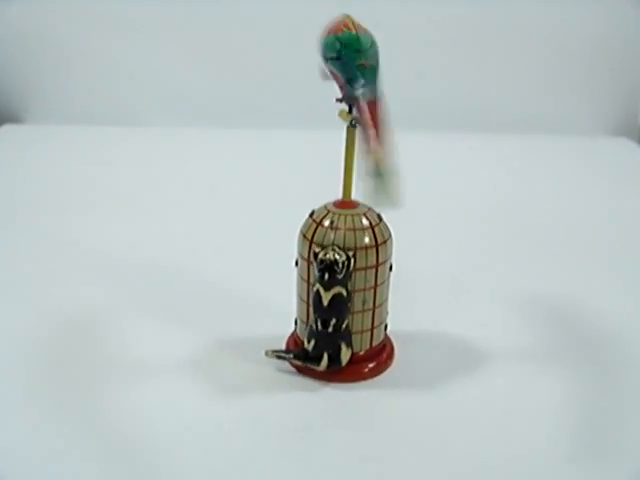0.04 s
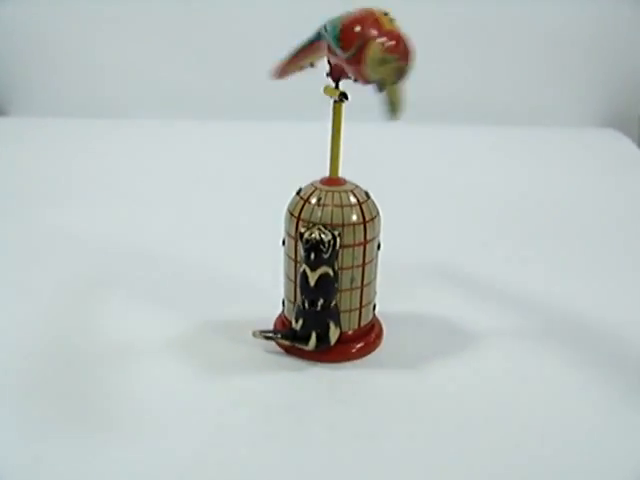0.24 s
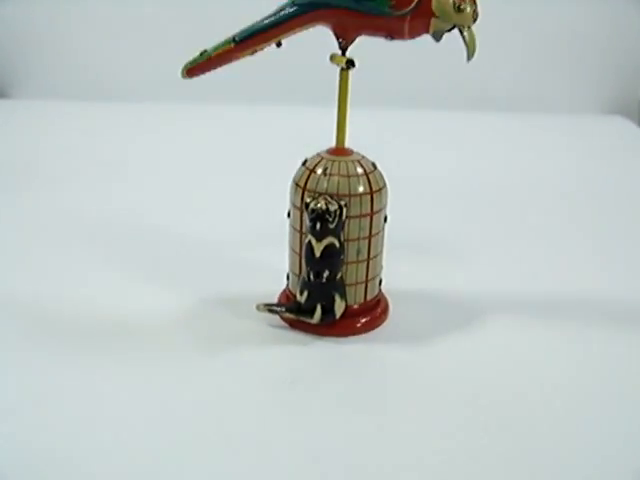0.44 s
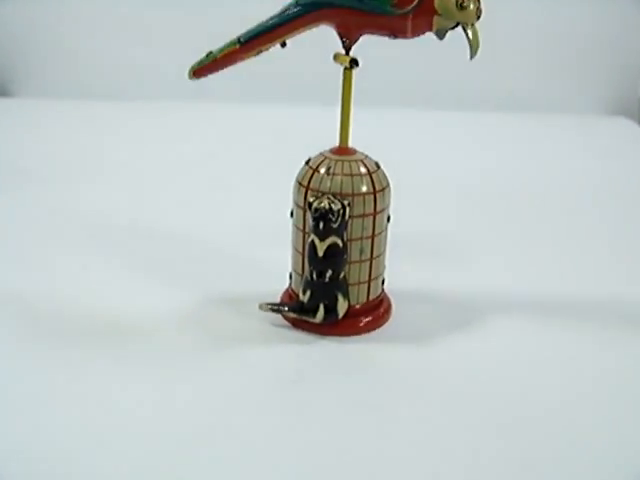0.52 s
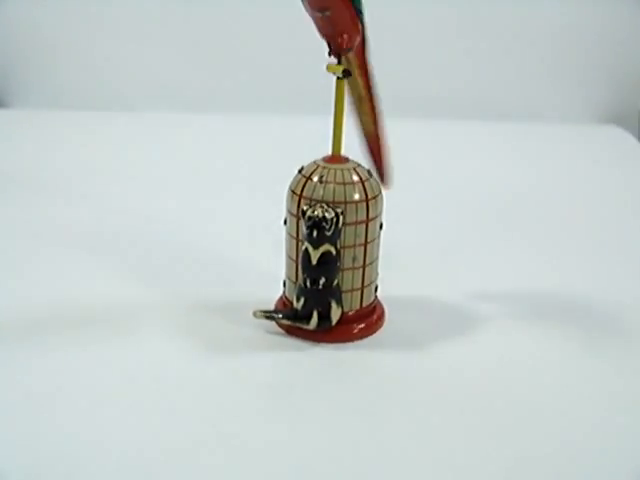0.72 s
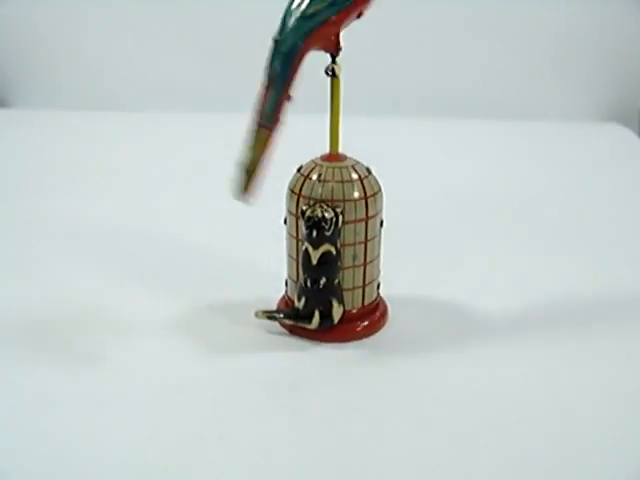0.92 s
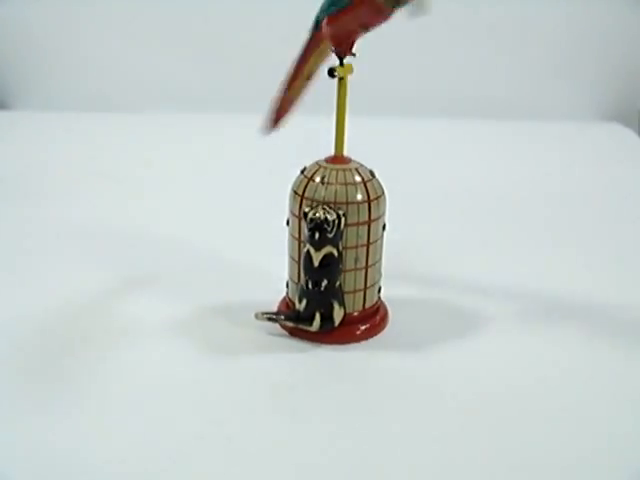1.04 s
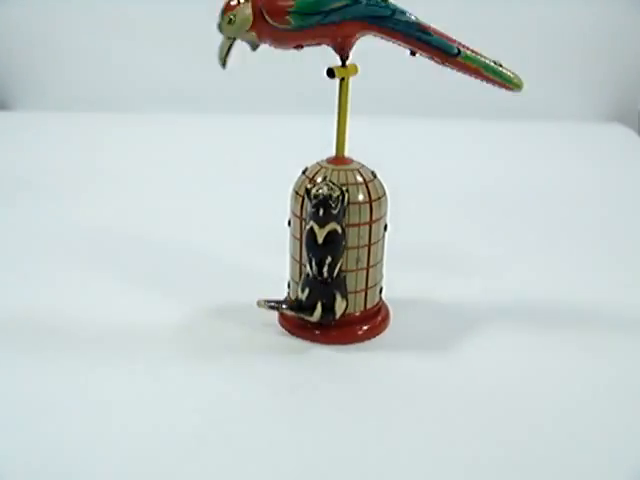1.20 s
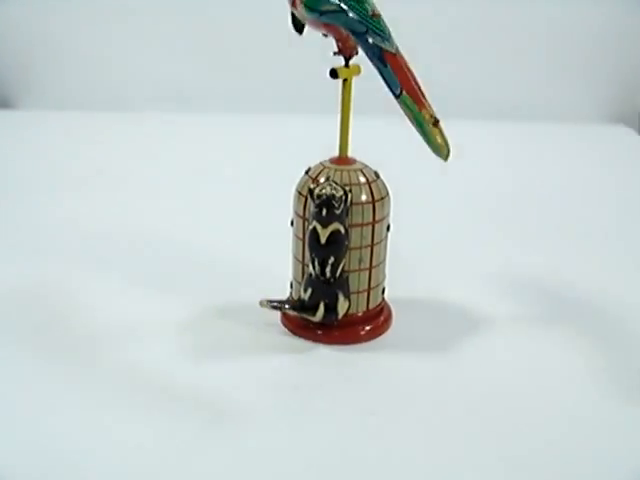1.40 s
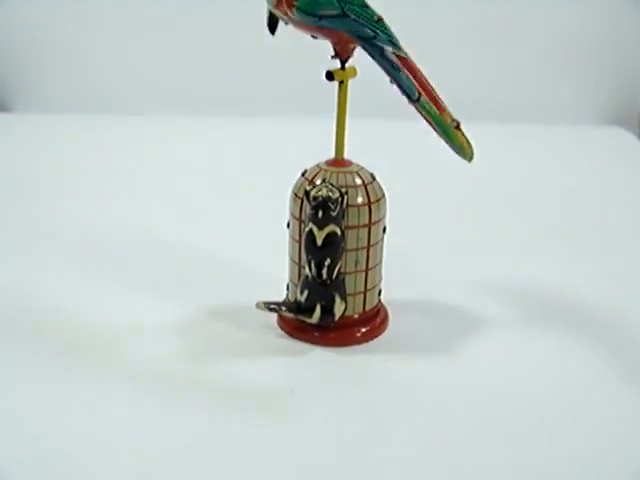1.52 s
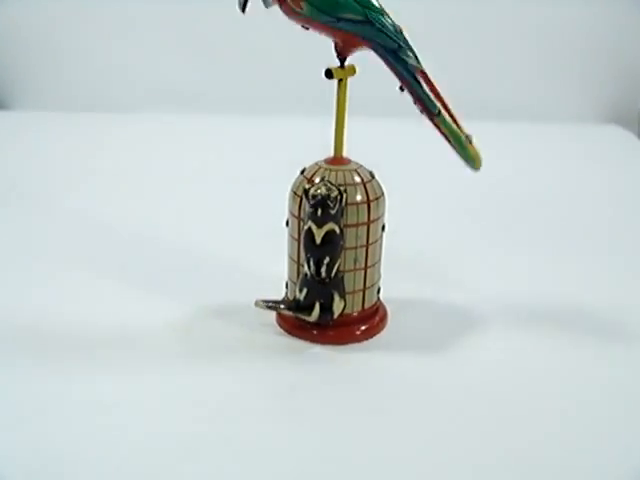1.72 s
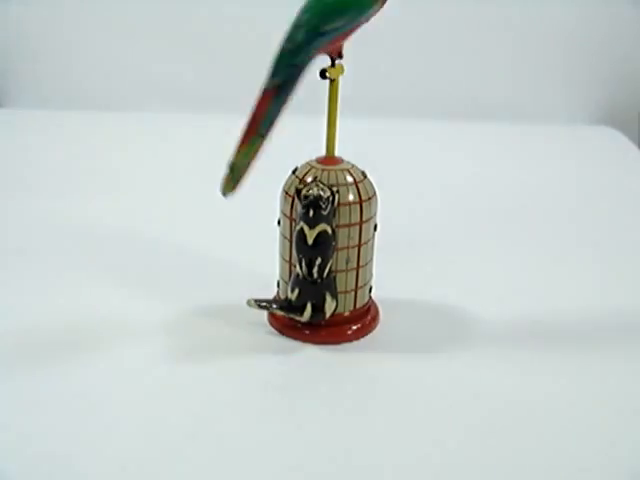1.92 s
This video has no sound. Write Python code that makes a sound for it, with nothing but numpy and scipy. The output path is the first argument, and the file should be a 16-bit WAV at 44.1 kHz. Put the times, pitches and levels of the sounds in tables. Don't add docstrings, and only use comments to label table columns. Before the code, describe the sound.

A tin wind-up toy clacks on a table. After a faint whir and ticks, five loud bouncing clacks at 0.22-0.44 s rattle the thin shell and ring briefly. Near quiet until 0.8 s, then ticks, scrapes and weaker clacks from 0.87 s, growing to a hard cluster at 1.22-1.32 s and a sharp base slap at 1.42 s. Small knocks and ticks follow until 1.92 s over soft room hiss.

```python
import sys
import numpy as np
from scipy import signal
from scipy.fft import rfft, irfft, next_fast_len
from scipy.io import wavfile
from scipy.ndimage import uniform_filter1d

SR = 44100
rng = np.random.default_rng(int(sys.argv[2]) if len(sys.argv) > 2 else 0)


def volts_from_db(level):
    exponent = np.asarray(level, float) / 20
    return 10 ** exponent


def master_out(mix):
    frames = np.transpose(np.atleast_2d(mix))
    ceiling = np.clip(frames, -1, 1)
    pcm = np.round(ceiling * 32767).astype(np.int16)
    wavfile.write(sys.argv[1], SR, pcm)


N = 85995
SIZE = 8192


def unit(x):
    return x / np.sqrt(np.mean(x ** 2) + 1e-20)


def along(points, hz):
    f, value = np.transpose(points)
    return np.interp(np.log(hz + 1), np.log(f + 1), value)


def curve(rows):
    s, db = np.transpose(rows)
    return volts_from_db(np.interp(np.arange(N) / SR, s, db))


def filtered(x, response):
    m = 2 * next_fast_len((len(x) + SIZE) // 2)
    return irfft(rfft(x, m) * response(np.fft.rfftfreq(m, 1 / SR)), m)[:len(x)]


def add(out, s, x):
    part = out[round(s * SR):][:len(x)]
    part += x[:len(part)]


# t/s, level/dB, favoured mode f/Hz, brightness level/dB, low dome note level/dB
CLACKS = [(0.2191, -13.6, 2250, -0.8, 7.5), (0.2519, -16.2, 2800.0, -3.6, -0.9),
          (0.299, -18.0, 3500.0, 0.5, 10.2), (0.3545, -18.1, 3520.0, 3.1, 5.9),
          (0.4375, -18.3, 1800, 0.9, 0.5), (0.8905, -26.7, 2230.0, 0.3, -2.0),
          (0.9334, -27.5, 3700, -1.8, -4.9), (1.1324, -24.6, 1950.0, -4.1, -13.2),
          (1.1683, -28.3, 3480, 1.6, -3.1), (1.2217, -17.9, 3600.0, 4.6, 2.3),
          (1.2457, -24.3, 3600.0, 1.2, -1.1), (1.2558, -26.9, 6800.0, 4.6, -3.0),
          (1.2627, -20.8, 2280.0, 6.7, 1.7), (1.3241, -18.3, 2200, 0.9, 0.7),
          (1.4193, -20.6, 4300, 1.3, 1.3)]


def clacks():
    return blows(CLACKS, rise_s=0.0012, t60=0.021, spike_db=14.5)


def blows(rows, rise_s, t60, spike_db):
    lead_s, peak_s = .005, .001
    favour_db, favour_width_hz = 1, 500
    shake_db, shake_s = -18.5, 0.16
    out, t = np.zeros(N), np.arange(SIZE) / SR - lead_s
    swell = np.exp(np.minimum(t - peak_s, 0) / rise_s)
    decay = volts_from_db(-60 * (t - peak_s) / t60) + volts_from_db(shake_db - 60 * t / shake_s)
    for s, db, hz, *colour_db in rows:
        force = chatter(SIZE) * np.where(t < peak_s, swell, decay)
        force[round(.006 * SR)] += volts_from_db(spike_db + 10 + 0.45 * db)

        def shell(f):
            return tin(f, *colour_db) * (1 + volts_from_db(favour_db) * mode(f, hz, favour_width_hz))

        x = filtered(even(force), shell)
        strength = np.std(x[round(lead_s * SR):][:round(.006 * SR)])
        add(out, s - lead_s, volts_from_db(db) * x / strength)
    return out


def chatter(count):
    jumps = 2.98 * uniform_filter1d(rng.standard_normal(count), size=9)
    return unit(rng.standard_normal(count) * volts_from_db(4.97 * jumps))


def even(force):
    z = rfft(force)
    power = uniform_filter1d(np.abs(z) ** 2, size=round(500 * len(force) / SR))
    return irfft(z / np.sqrt(np.abs(power) + 1e-9))


def mode(f, hz, width_hz):
    return 1j * f * width_hz / (hz * hz - f * f + 1j * f * width_hz)


# f/Hz, width f/Hz, level/dB
TIN_MODES = [(1085, 91, -5), (1490, 120, -5), (1790, 110, 1), (2030, 150, .5), (2300, 220, -5),
             (2710, 260, -2), (3068, 400, -11), (3520, 220, -2.5), (3900, 260, -8.5), (4727, 490, -8),
             (5150, 350, -10.5), (6650, 550, -5.5), (7586, 600, -6.5), (9283, 1220, -10.5)]


def tin(f, bright_db=0, dome_db=0):
    scatter_db, body_db = 1.5, -22
    gains = volts_from_db(scatter_db * rng.standard_normal(len(TIN_MODES)))
    power = 0
    for (hz, width_hz, db), gain in zip(TIN_MODES, gains):
        level = db + bright_db * (hz > 4400) + dome_db * (hz < 1200)
        power = power + np.abs(gain * volts_from_db(level) * mode(f, hz, width_hz)) ** 2
    radiated = f ** 4 / (755 ** 4 + f ** 4)
    return causal(volts_from_db(body_db) + np.sqrt(power) * radiated)


def causal(gain):
    c = irfft(np.log(gain + 1e-6))
    c[1:len(c) // 2] *= 2
    c[len(c) // 2 + 1:] = 0
    return np.exp(rfft(c))


# f/Hz, level/dB, t60 t/s
CAGE_RINGS = [(1785, -21.5, 0.31), (2000, -26, .14), (2700, -26, .14), (3540, -25, .25), (3914, -27, 0.3),
              (5240, -24, 0.19), (7300, -22, 0.053)]


def rings():
    out, t = np.zeros(N), np.arange(SR // 2) / SR
    for s, db, *_, dome_db in CLACKS:
        dome_hz = 1085 * (1 + .012 * rng.standard_normal())
        add(out, s, volts_from_db(db + dome_db - 23 - 60 * t / .08) * np.sin(2 * np.pi * dome_hz * t))
        for hz, level, t60 in CAGE_RINGS:
            fade = volts_from_db(db + level + 3 * rng.standard_normal() - 60 * t / t60)
            ring_hz = hz * (1 + .004 * rng.standard_normal())
            waver = .000014 * hz * np.cumsum(rng.standard_normal(len(t)))
            add(out, s, fade * np.sin(2 * np.pi * ring_hz * t + waver))
    pole = volts_from_db(-50 - 60 * t / 1.5) * np.sin(2 * np.pi * 738 * t)
    add(out, .44, pole * np.sin(2 * np.pi * t) ** .5)
    return out


# t/s, level/dB, favoured mode f/Hz, brightness level/dB
TICKS = [(0.0881, -39.7, 2300.0, -7.9), (0.1849, -45.3, 2200.0, -10.0), (0.1946, -49.3, 2600.0, 11.0),
         (0.2405, -26.1, 1790.0, -8.7), (0.2626, -29.5, 3300.0, -3.5), (0.2774, -33.9, 3500.0, 3.0),
         (0.3317, -38.5, 3520.0, -2.5), (0.3794, -31.7, 3400.0, -4.3), (0.4285, -32.1, 2300.0, -14.9),
         (0.4605, -37.9, 3850.0, -5.1), (0.4906, -38.0, 3500.0, -8.9), (0.7946, -39.7, 2900.0, 6.6),
         (0.8283, -40.6, 1050.0, -7.0), (0.8467, -42.0, 2010.0, -5.8), (0.8695, -42.2, 3500.0, -0.6),
         (0.8747, -29.9, 2300.0, 0.1), (0.8778, -34.2, 2600.0, -1.6), (0.922, -36.0, 2000.0, -10.7),
         (0.9283, -33.2, 2000.0, -5.9), (0.9807, -35.1, 2910.0, 1.9), (1.0058, -39.1, 2230.0, -0.2),
         (1.0228, -45.3, 3740.0, -7.3), (1.0375, -33.1, 3590.0, 3.6), (1.0495, -34.1, 2270.0, 1.4),
         (1.106, -47.2, 1720.0, -24.0), (1.1216, -34.7, 3700.0, -0.6), (1.1763, -37.7, 2300.0, -3.0),
         (1.211, -44.2, 2300.0, -8.9), (1.3932, -46.1, 3200.0, -15.0), (1.5231, -45.3, 3330.0, -3.1),
         (1.865, -41.3, 1150.0, -17.1), (1.8749, -52.3, 5000.0, 3.8), (1.918, -41.1, 2300.0, -10.6)]


def ticks():
    return blows(TICKS, rise_s=0.0007, t60=0.028, spike_db=19)


# start t/s, length t/s, level/dB, brightness level/dB
SCRAPES = [(0.874, 0.010, -38, -1), (0.897, 0.009, -38, -1), (0.923, 0.017, -38, -4),
           (0.98, 0.033, -47.5, 4.5), (1.122, .009, -32.5, 0), (1.158, .008, -32.5, 0),
           (1.18, 0.028, -45, -0.5), (1.268, 0.0357, -34, 3), (1.348, 0.023, -45, 10),
           (0.42, 0.024, -42, -16), (.262, 0.068, -34.5, -6), (.228, 0.0256, -33, 7), (.308, .03, -34.5, 0),
           (1.228, .014, -36.5, -5.5), (.45, 0.066, -45, -1)]


def scrapes():
    out, t = np.zeros(N), np.arange(SIZE) / SR
    for s, length, db, bright_db in SCRAPES:
        shape = np.clip(t / 0.0012, 0, 1) * np.clip((length - t) / .004 + 1, 0, 1)
        x = filtered(chatter(SIZE), lambda f: tin(f, bright_db))
        add(out, s, volts_from_db(db) * unit(x) * shape)
    return out


# t/s, peak level/dB, pitch f/Hz
KNOCKS = [(.912, -35, 300), (.972, -39.5, 250), (1.389, -36, 800), (1.415, -24, 890), (1.576, -40.5, 1180),
          (1.605, -40, 600), (1.6655, -38.5, 600), (1.6655, -32, 1230), (1.6664, -35, 1960),
          (1.781, -44, 1430), (1.849, -41.5, 300)]


def knocks():
    out, t = np.zeros(N), np.arange(SIZE) / SR
    decay_cycles = 3.35
    for s, db, hz in KNOCKS:
        add(out, s, volts_from_db(db) * np.sin(2 * np.pi * hz * t) * np.exp(-t * hz / decay_cycles))
    return out


def slap():
    out, t = np.zeros(N), np.arange(SIZE) / SR
    push_s, back_s = .00011, .00026

    def bump(u):
        return u * np.exp(1 - u)

    push = bump(t / push_s)
    rebound = push_s / back_s * bump(t / back_s)
    add(out, 1.415, volts_from_db(-3.5) * (push - rebound))
    return out


# t/s, level/dB
SPRING = [(0, -50), (.2, -47.5), (.45, -48), (.56, -61), (.78, -63), (.9, -48.5), (1.12, -48.5),
          (1.36, -44.5), (1.55, -57.5), (1.8, -61), (1.86, -48), (1.95, -57.5)]
# t/s, level/dB
HUM = [(0.0, -65), (0.194, -61), (0.26, -44.5), (0.624, -79.5), (0.656, -72), (0.688, -72), (0.934, -49.5),
       (1.052, -56.5), (1.14, -44), (1.2, -57), (1.472, -53), (1.53, -66), (1.928, -70), (1.95, -70)]


def clockwork():
    whir = unit(filtered(chatter(N), lambda f: tin(f, -7)))
    rumble = unit(filtered(chatter(N), lambda f: mode(f, 300, 590) ** 2))
    hum = unit(filtered(rng.standard_normal(N), lambda f: mode(f, 134, 23) ** 2))
    return curve(SPRING) * (whir + volts_from_db(-2.5) * rumble) + curve(HUM) * hum


# f/Hz, t60 t/s
ROOM = [(300, 0.12), (1500, 0.32), (4000, .32), (9500, .3)]


def room(x):
    out, step = np.zeros(N), SR // 10
    for start in range(0, N, step):
        hz, t, z = signal.stft(rng.standard_normal(SR // 2), SR, nperseg=256)
        fade = volts_from_db(-60 * t / along(ROOM, hz)[:, None])
        tail = signal.istft(z * fade, SR, nperseg=256)[1]
        echo = signal.fftconvolve(x[start:start + step], tail / np.linalg.norm(tail))
        add(out, start / SR + .005, echo)
    return out


# f/Hz, level/dB
HISS = [(15, -28.5), (25, -28), (60, -11), (100, -19), (220, -3), (340, -3.5), (500, -9.5), (1700, -8),
        (3000, -15.5), (10000, -30.5), (22000, -120)]


def hiss():
    return volts_from_db(-52) * unit(filtered(rng.standard_normal(N), lambda f: volts_from_db(along(HISS, f))))


def scene():
    toy = clacks() + rings() + ticks() + scrapes() + knocks() + slap()
    return (toy + volts_from_db(-11) * room(toy) + clockwork() + hiss())[None]


# f/Hz, level/dB
STARVE = [(900, -60), (1500, -39), (3500, -31), (5200, -31), (6500, -27.5), (10000, -27)]


def starve(x):
    ahead_s, behind_s, behind_db = .024, .017, -.6
    jump_db, patchy_db = 10, 5
    hz, t, z = signal.stft(x, SR, nperseg=256)
    power = uniform_filter1d(uniform_filter1d(np.abs(z) ** 2, size=5, axis=0), size=2, axis=1)
    gap = t[None] - t[:, None]
    window = (gap < ahead_s) & (gap > -behind_s)
    near = window * power.sum(axis=0) * np.where(gap < 0, volts_from_db(2 * behind_db), 1)
    treble = np.where(near > 0, power[hz > 3000].sum(axis=0), np.nan)
    upset = np.nanmax(treble, axis=1) > volts_from_db(jump_db) ** 2 * np.nanmin(treble, axis=1)
    patches = rng.standard_normal((len(hz) // 6 + 1, len(t) // 3 + 1))
    patches = np.repeat(np.repeat(patches, 6, axis=0), 3, axis=1)[:len(hz), :len(t)]
    floor = volts_from_db(along(STARVE, hz)[:, None] + patchy_db * patches) ** 2
    keep = power > upset * near.max(axis=1) * floor
    keep &= ~((hz[:, None] > 4400) & (t > 1.433) & (t < 1.453))
    return signal.istft(z * keep, SR, nperseg=256)[1][:N]


def roll_off(x):
    return signal.sosfilt(signal.butter(12, 10190, fs=SR, output="sos"), x)


def record(dry):
    top_hz, edge_hz = 10250, 350
    full_scale, hardness = .72, 12

    def band_limit(f):
        return np.sin(np.pi / 2 * np.clip((top_hz - f) / edge_hz, 0, 1)) ** 2

    x = filtered(starve(dry[0]), band_limit)
    x = x / (1 + np.abs(x / full_scale) ** hardness) ** (1 / hardness)
    return roll_off(x[None])


dry = scene()
out = record(dry)
master_out(out)
```